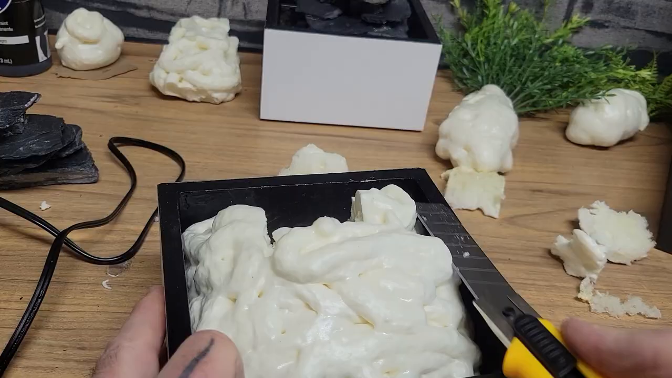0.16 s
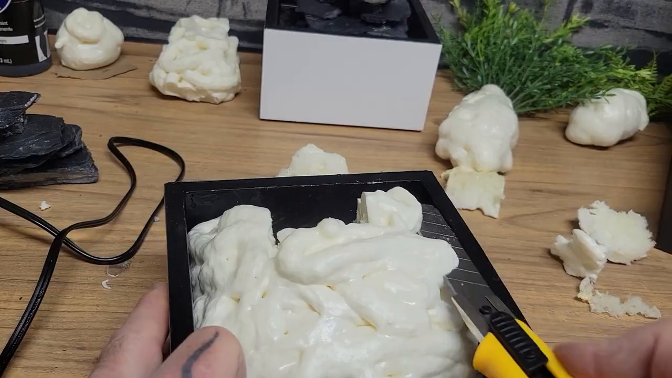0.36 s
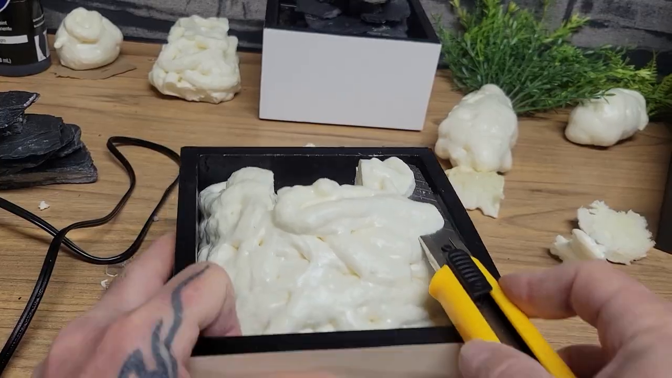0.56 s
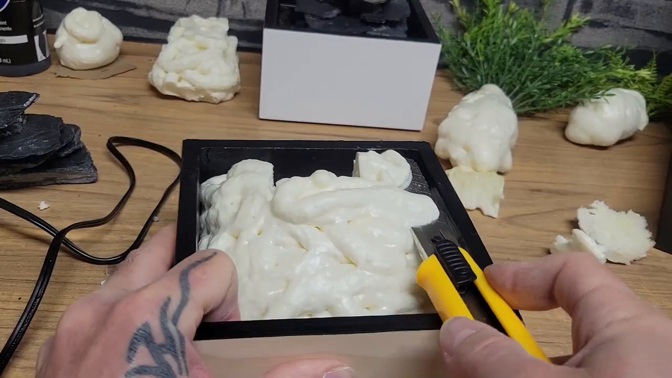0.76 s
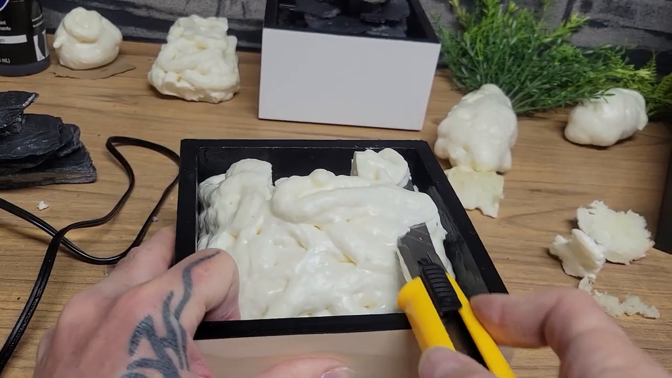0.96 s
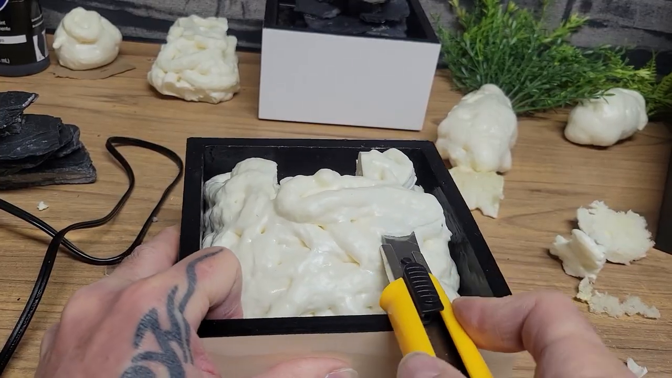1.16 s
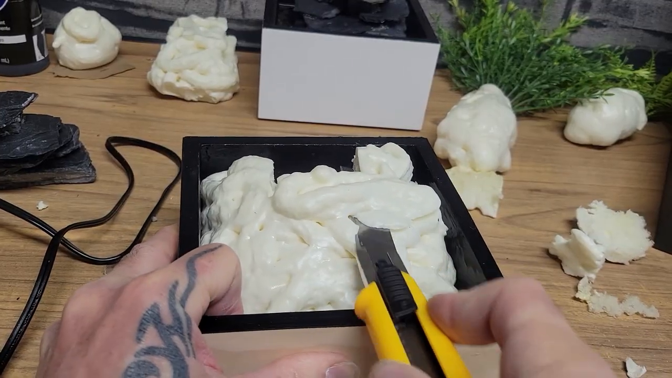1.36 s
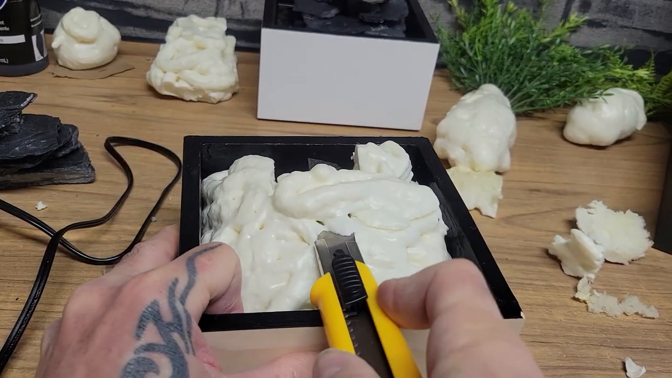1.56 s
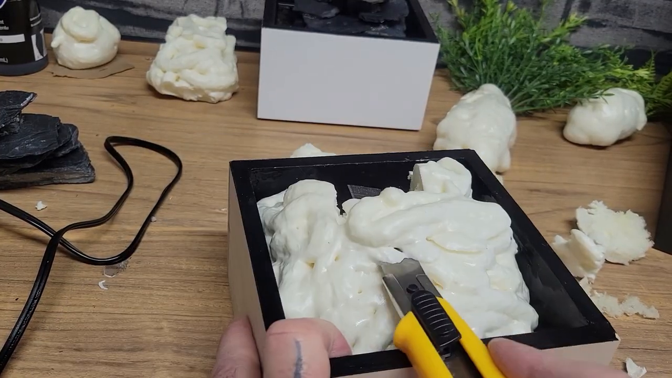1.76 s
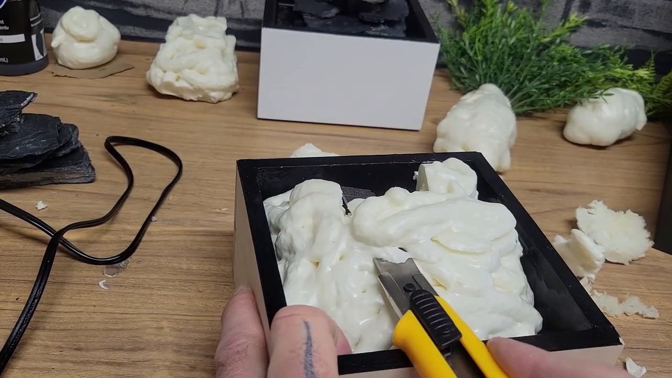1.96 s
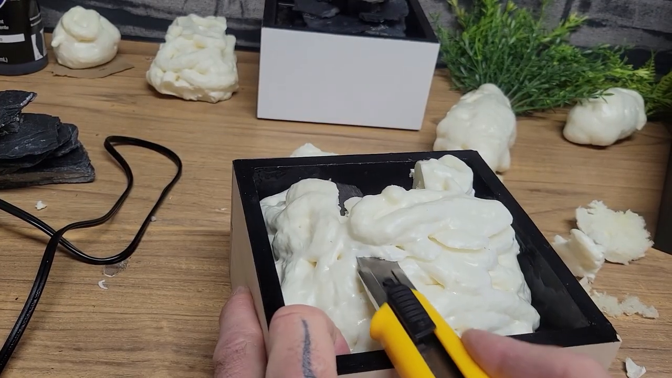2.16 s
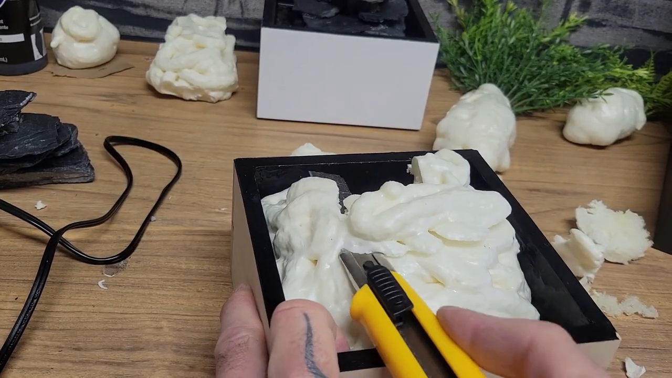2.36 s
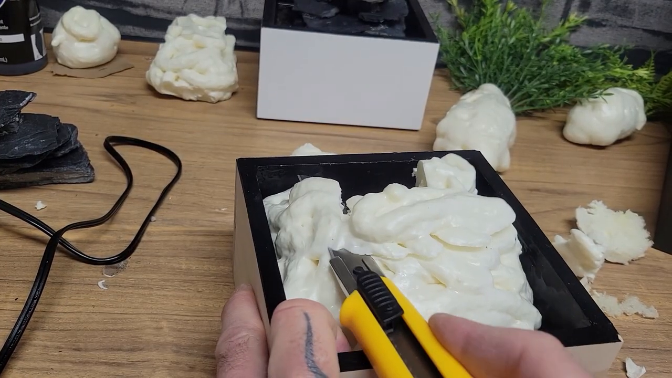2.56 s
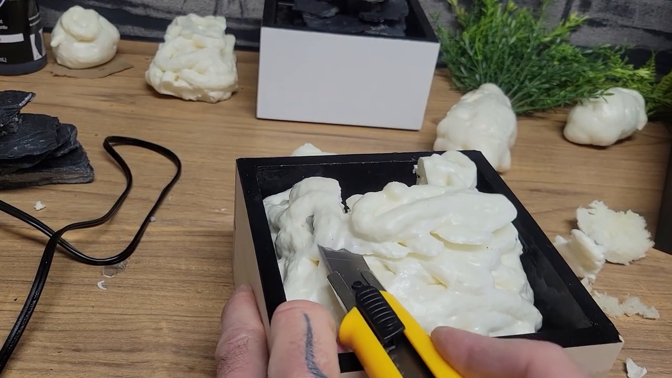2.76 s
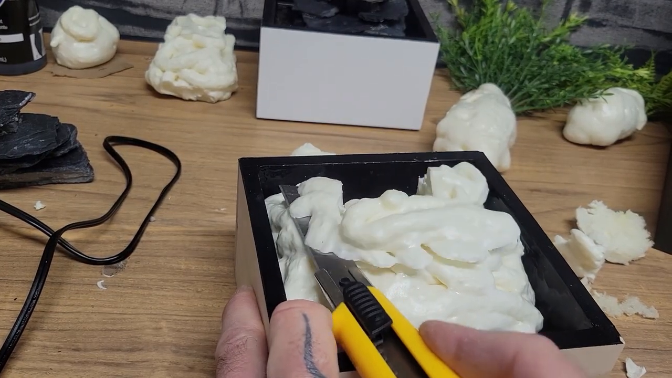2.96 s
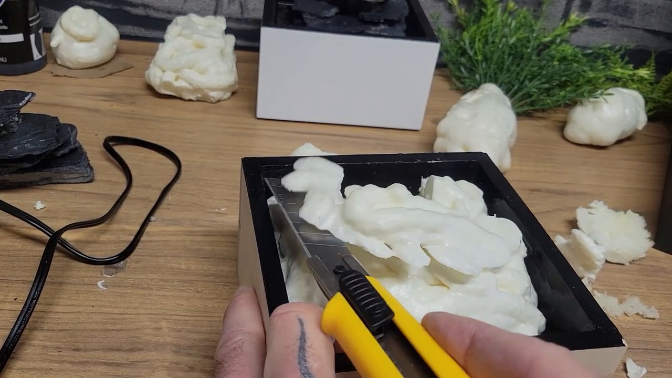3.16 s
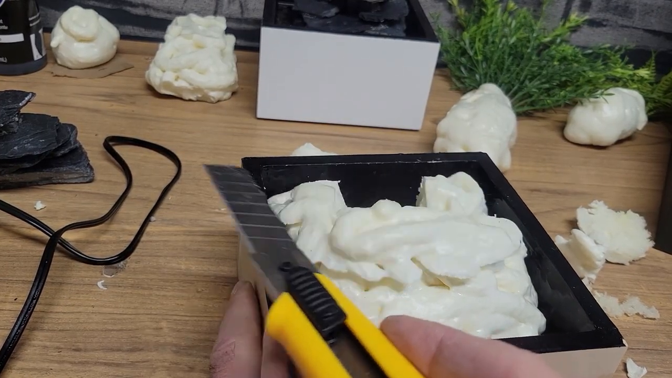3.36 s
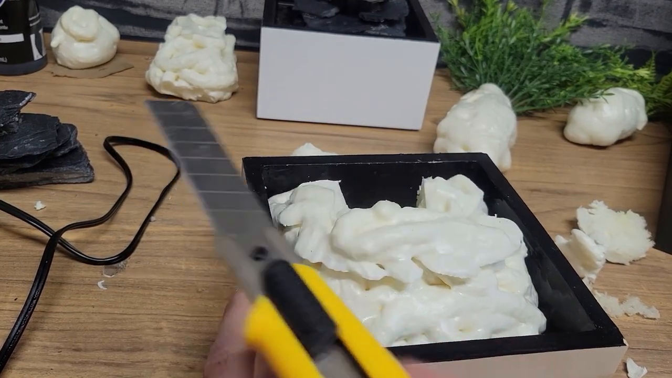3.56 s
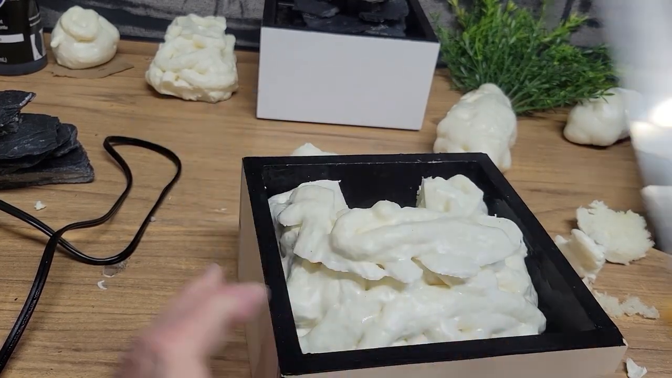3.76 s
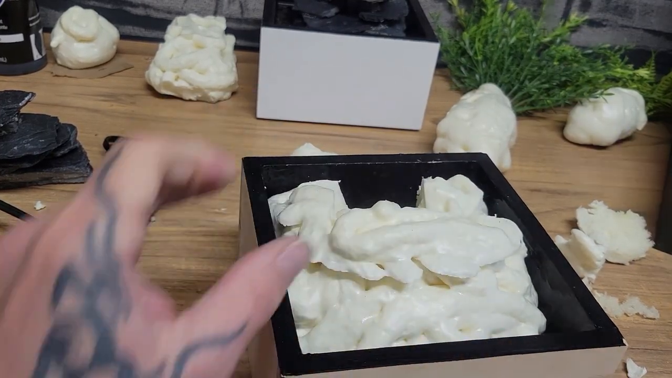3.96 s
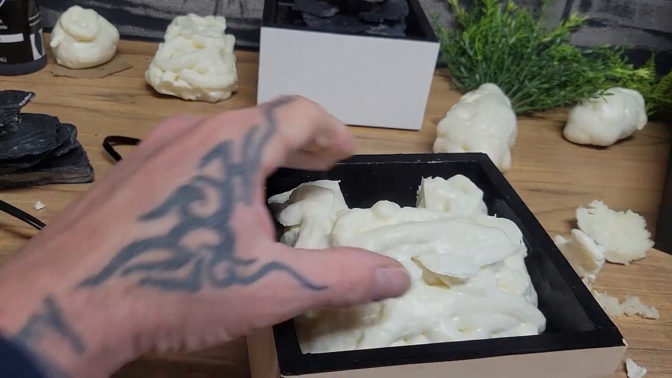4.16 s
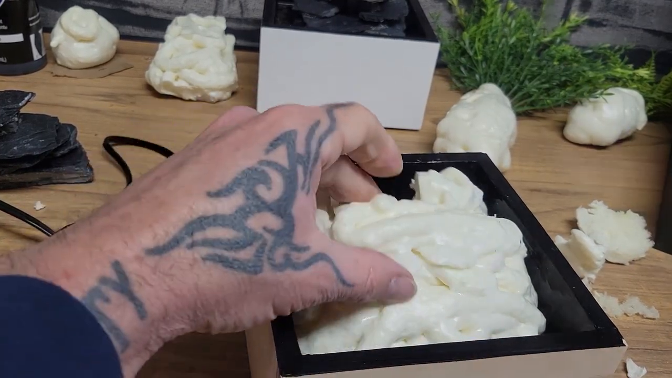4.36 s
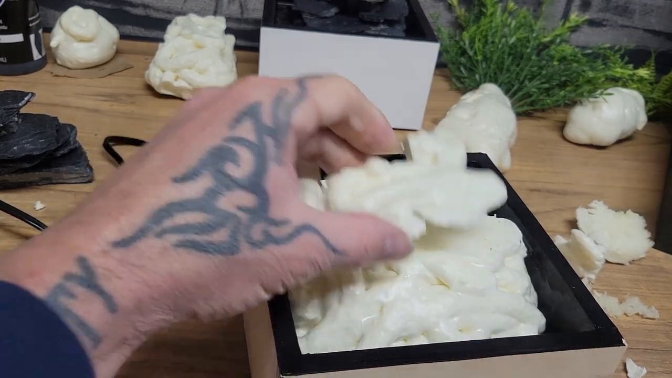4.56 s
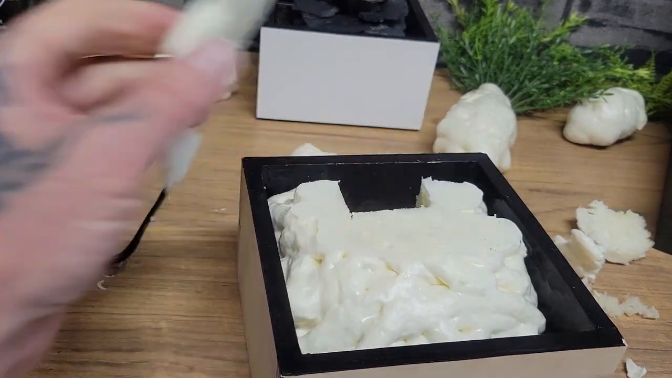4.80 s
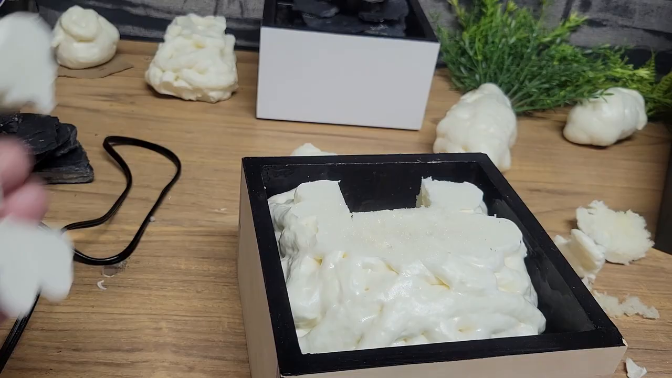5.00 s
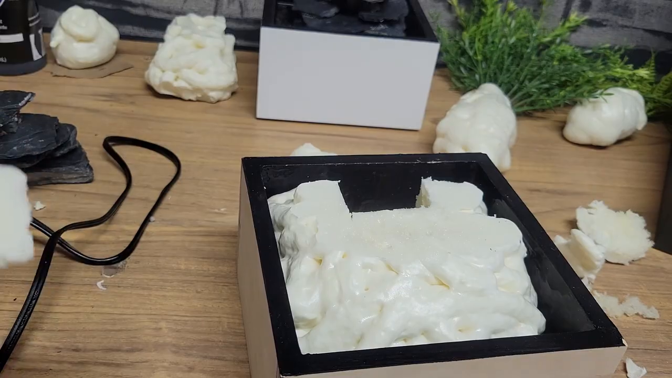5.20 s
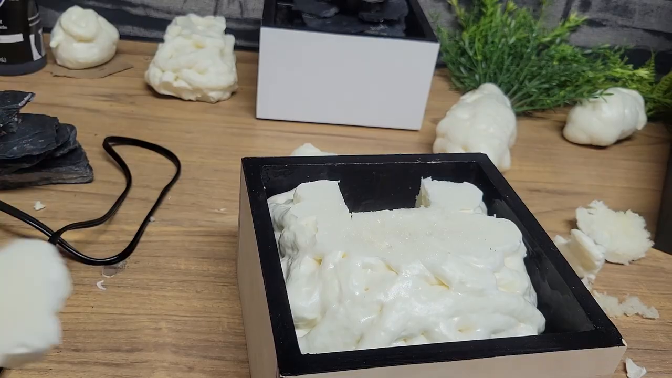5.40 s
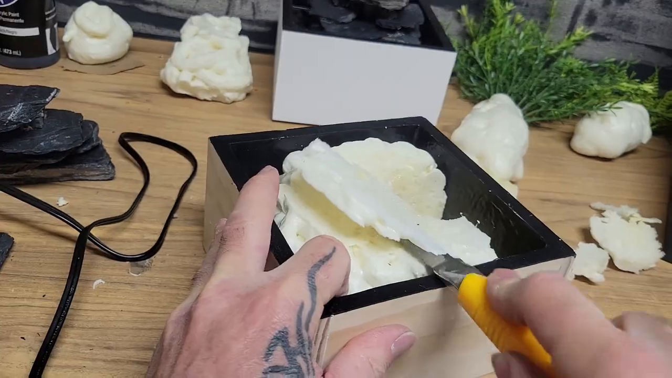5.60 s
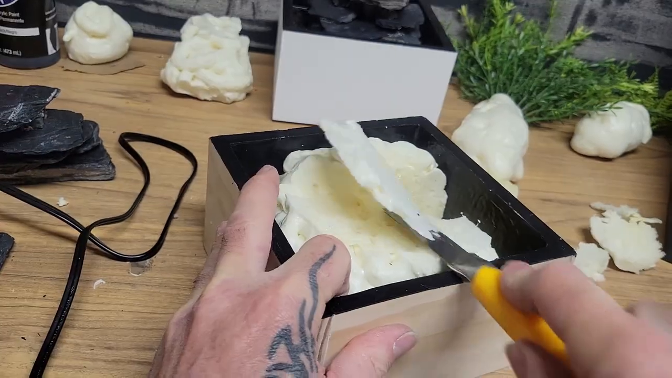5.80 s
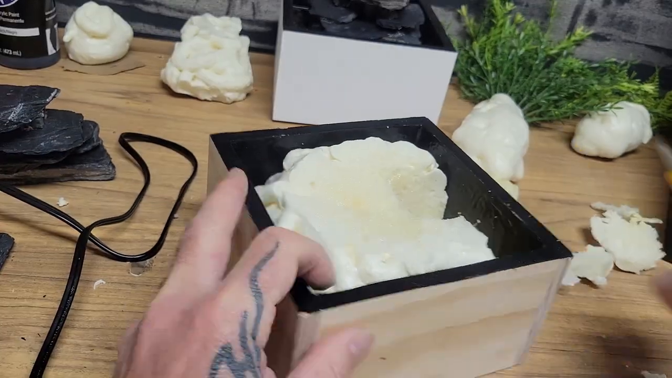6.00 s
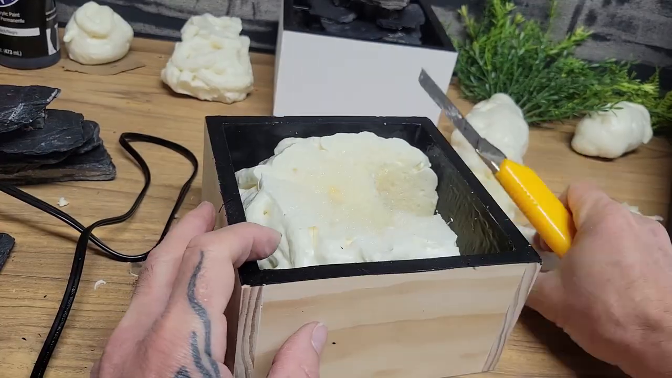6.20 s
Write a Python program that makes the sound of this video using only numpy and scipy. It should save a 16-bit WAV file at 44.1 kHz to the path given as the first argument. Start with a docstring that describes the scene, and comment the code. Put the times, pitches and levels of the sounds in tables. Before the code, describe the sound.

A close phone pickup in a quiet indoor room with low rumble and a faint hum that soon fades. At about 0.2 seconds six quick, loud rasps of a blade in stiff foam, each with a short squeak, end by 0.4. Soft hand rustles follow. From 0.65 to 1.6 a steady run of rapid strokes, nearly thirty a second, dry and gritty with changing squeak pitches and dull box knocks. A tiny hush at 1.7, then slightly slower sawing from 1.8 to 3.1, squeakier and brighter around 2.2 to 2.5, with stronger wooden bumps. It stops; small ticks near 3.4, faint brushing, and a soft rubbing grip at 4.3 to 4.5. Crisp rustles and clicks swell from 5.1 to 5.5. A brief, weaker cut runs 5.55 to 5.8 over a low bench ring, then knocks, ticks and light rustles to the end.

```python
"""A snap-off knife is heard sawing stiff foam in quick strokes, about 25 a second, close to a phone.
The foam lies in a wooden box on a bench. Each stroke tears cells (banded noise rasp) and makes the
blade stick and slip (harmonic squeak); between cuts hands rustle and pull, and ticks crack and ring.
The box knocks on the bench (decaying modes), and the bench top rings low (a gliding sine).
Behind lie a faint machine hum and a quiet room of shaped noise; two microphone ports hear it all."""
import sys
import numpy as np
from scipy import signal
from scipy.fft import rfft, irfft, next_fast_len
from scipy.io import wavfile
from scipy.ndimage import uniform_filter1d

SR = 44100
rng = np.random.default_rng(int(sys.argv[2]) if len(sys.argv) > 2 else 0)


def inscribe(sig):
    """Save sig as 16-bit PCM at rate SR to the path in sys.argv[1].

    A 1-D sig is mono; a 2-D sig holds one channel per row.
    Samples are clipped to [-1, 1] before scaling.
    """
    pcm = np.round(np.clip(np.atleast_2d(sig).T, -1, 1) * 32767)
    wavfile.write(sys.argv[1], SR, pcm.astype(np.int16))


N = 275184
T = np.arange(N) / SR

# All levels are those ahead of the phone's gain control.
# Knife strokes: peak_s, rise_ms (from 8 dB below the peak), rasp_db, squeak_hz, squeak_over_rasp_db
STROKES = [(0.1892, 8.1, -39, 824, 0), (0.2259, 8.7, -18, 1518, -3), (0.2569, 5.7, -25.5, 829, 6),
           (.2873, 6.7, -18, 1163, 1.5), (0.3223, 6.4, -21.5, 845, 0), (0.3517, 5.9, -25, 2019, 6.5),
           (0.629, 3.5, -49.5, 1820, -4), (.6725, 3, -38, 587, -3), (.6861, 8.2, -26, 587, 3.5),
           (0.7212, 6.9, -30, 1583, 3), (0.7511, 6.9, -19, 1976, -3.5), (0.7942, 7.8, -27, 1502, 3.5),
           (0.8295, 6.6, -20, 867, -1.5), (0.8655, 5.3, -23, 1346, -5.5), (0.8983, 5.4, -21, 641, -1),
           (0.9373, 7.3, -21.5, 1378, 0), (0.9727, 8, -24.5, 624, 4.5), (1.0088, 7.3, -27.5, 1152, 4),
           (1.0423, 5.5, -22, 1464, -4.5), (1.0818, 7.4, -31.5, 915, -4.5), (1.117, 7.2, -24.5, 991, -1.5),
           (1.151, 6.2, -30, 894, -5), (1.1862, 9.1, -25.5, 1976, -1), (1.2258, 8.9, -31, 668, -4.5),
           (1.2623, 8.8, -28.5, 619, -5.5), (1.2935, 8.9, -41, 603, 4), (1.335, 14.6, -22.5, 549, 4),
           (1.368, 12, -35.5, 603, 5), (1.4059, 13, -27, 511, -2.5), (1.4399, 9.9, -28.5, 942, -9),
           (1.4774, 12.2, -24.5, 1141, -8.5), (1.5108, 8.6, -29, 1077, -12.5), (1.5439, 8.2, -21, 1093, 0),
           (1.5731, 5.6, -31.5, 1077, -7.5), (1.7868, 10.8, -29, 985, -9), (1.837, 14.7, -32, 856, -8),
           (1.888, 11, -25, 646, -9), (1.9279, 11, -30.5, 484, -7), (1.985, 13.8, -22.5, 1728, -12),
           (2.0297, 13, -33.5, 1260, -5.5), (2.075, 8.2, -23.5, 2030, -13), (2.1248, 16, -23.5, 1615, -7.5),
           (2.1677, 13.6, -25, 1846, 3), (2.203, 6.7, -27, 1700, 0), (2.2233, 15, -24, 2150, 3.5),
           (2.2607, 6.5, -20, 1529, 2.5), (2.3024, 7.3, -19.5, 1335, 0), (2.3491, 8.2, -21, 1400, -1.5),
           (2.3928, 8, -19, 1500, -0.5), (2.4416, 9.6, -22.5, 1475, 5.5), (2.4936, 17.3, -27, 1534, 1.5),
           (2.5338, 9.3, -23.5, 1184, -5.5), (2.5859, 14.7, -28, 1820, -1), (2.6274, 10.7, -28.5, 1254, 3),
           (2.6694, 10.8, -29.5, 1480, 0), (2.712, 11.7, -27.5, 1378, 5), (2.7558, 11, -23.5, 1787, 1),
           (2.802, 10.5, -26, 1174, 1.5), (2.8481, 12.5, -26, 1890, -3), (2.8826, 7.9, -29.5, 2250, -7),
           (2.9289, 7.2, -30.5, 2056, 0), (2.9699, 12, -28.5, 1814, -7), (3.0123, 8.8, -31.5, 1701, -3),
           (3.0497, 8.4, -29, 1798, -7.5), (3.0639, 7.6, -33, 1653, -12), (5.5501, 5, -46, 1044, 5),
           (5.575, 3.7, -39.5, 1100, -1), (5.5919, 5.4, -26.5, 3710, 0), (5.622, 6.5, -42.5, 980, 4),
           (5.6466, 4.6, -49, 2272, -6), (5.6783, 10.3, -39, 888, -6), (5.711, 8.7, -31, 2200, -3),
           (5.7354, 5.1, -28.5, 1136, -7), (5.772, 7.9, -36.5, 1114, -10.5), (5.799, 9, -32.5, 1292, -10),
           (5.8186, 10.5, -29, 1292, -17)]
# The blade drags on between strokes, one list per cut: time_s, rasp_db
DRAG = [
    [(0.17, -77), (0.332, -70), (0.41, -77.5)],
    [(0.65, -58.5), (0.85, -43), (0.926, -55.5), (1.43, -67.5), (1.6, -72)],
    [(1.77, -68), (1.986, -44), (2.296, -39.5), (2.912, -46.5), (3.064, -49.5), (3.11, -65.5)],
    [(5.53, -53), (5.644, -61), (5.87, -72)],
]
# Colour of the rasp as the blade moves through the block: time_s, sizzle_over_rasp_db, body_over_rasp_db
CUT_COLOUR = [(.2, -4.5, 1), (.35, 2.5, 1.5), (0.629, -5, 0), (.83, 2, -2), (1.0, 1, -1), (1.3, -6, -9),
              (1.569, 0, -2), (1.79, -4.5, -4), (2.1, -4, -7), (2.25, -0.5, 1), (2.35, 2, -1),
              (2.6, 0, -4.5), (2.87, 4.5, -5), (3.06, 2, -12.5), (5.55, 7.5, 5.5), (5.595, -5, -5),
              (5.63, 4, 4), (5.72, -1.5, 0.5), (5.821, -1.5, -1)]
# Mean spectrum of tearing foam: frequency_hz, relative_level_db (per Hz)
FOAM_SPECTRUM = [(250, -24), (420, -23), (544, -6.5), (736, -6.5), (870, -2.5), (1040, -6), (1390, -3),
                 (2480, -7.5), (3570, -3), (7860, -6.5), (11000, -14.5), (15100, -10), (15800, -20.5)]
# Harmonics of the sharp slip pulse, from the fundamental up: relative_level_db
SQUEAK_HARMONICS_DB = [5.5, -7.5, -12.5, -16.5, -24]
# Hands brush and pull the foam: peak_s, swell_ms (to 8 dB below the peak), rasp_db,
# sizzle_over_rasp_db, body_over_rasp_db
RUSTLES = [(.12, 27, -77.5, 9, -17), (0.387, 7.5, -48, -8, 3), (.485, 15, -61.5, -18, 13),
           (.52, 22, -62.5, -12, 12), (1.599, 6.8, -52, -12, -6), (1.631, 9.7, -51.5, -7, -5),
           (3.132, 25, -73, 5, -8), (3.21, 27, -72.5, 1, 4), (3.278, 33, -71, -7, 12),
           (3.71, 62, -71.5, -9.5, -21.5), (3.82, 40, -66.5, -12.5, -32), (4.07, 25, -73.5, -16, -24.5),
           (4.264, 14, -57.5, -0.5, -32), (4.325, 33, -52, -4.5, -6), (4.365, 31, -51, -5, 2.5),
           (4.418, 40, -52.5, -6.5, -1), (4.761, 42, -65.5, 4.5, -5.5), (4.914, 21, -71, -2, -30),
           (5.0, 46, -73, 3, -29), (5.098, 31, -56.5, 3, -16), (5.137, 17, -55, 2.5, -15),
           (5.23, 23.7, -46.5, -1.5, -22), (5.36, 33.6, -47.5, 1, -18), (5.469, 42.4, -43, 6, -16),
           (5.51, 22, -47.5, -1, -16), (5.856, 21, -63, -2, -5.5), (5.985, 16.5, -57.5, -21, 7.5),
           (6.055, 17.2, -50, 0, -11.5), (6.184, 14.7, -50, -0.5, -5), (6.226, 11, -52.5, 1, -5)]
# Skin sticks and slips on the foam: pitch_hz, level_over_grip_db
SKIN_RUB = [(800, 3), (1050, -4.5), (1350, -2)]
# Crumbs snap and plastic taps: start_s, level_db, ring_hz
TICKS = [(0.599, -62, 844), (3.339, -39, 755), (3.3746, -52, 750), (3.4375, -51, 3220), (4.1998, -58, 705),
         (4.3027, -42.5, 5910), (4.5457, -58, 853), (4.912, -56, 6760), (5.187, -47, 7440),
         (5.368, -35.5, 5900), (5.8844, -47, 770), (5.9019, -46, 703), (6.0593, -41.5, 1162),
         (6.0957, -52, 1112)]
# The box knocks on the bench: thud_risen_s, thud_peak_db, wood_over_thud_db
KNOCKS = [(0.362, -46.5, -14), (0.767, -44.5, -2.5), (0.825, -40.5, -3), (0.932, -42.5, 2),
          (1.126, -44, 13), (1.2, -45.5, 5), (1.255, -33, -4), (1.435, -48, 9.5), (1.588, -36.5, 0.5),
          (1.802, -45.5, 10), (1.885, -28, 5), (1.915, -40, 10), (1.999, -35, -0.5), (2.097, -37, -3.5),
          (2.188, -31, 2.5), (2.299, -34, 14), (2.383, -31, 9), (2.47, -40.5, -4), (2.527, -37.5, 0),
          (2.644, -37.5, 0.5), (2.73, -40, 1.5), (2.862, -41.5, -7), (3.338, -51, 8.5), (5.549, -49, 8),
          (5.588, -53, 15), (5.762, -60, 8), (5.821, -36.5, 10), (5.974, -35, -0.5), (6.0, -35, -8.5),
          (6.158, -57, -1)]
# Modes of the thud: pitch_hz, relative_level_db, t60_s
THUD_MODES = [(129.4, -4.5, 0.23), (138, -12, .12)]
# Mean modes of the wood, varied from knock to knock: pitch_hz, relative_level_db, t60_s
WOOD_MODES = [(204, -3.5, 0.07), (326, 1, 0.083), (401, 1, 0.069), (576, -2.5, 0.063)]
# Low ring of the bench top: time_s, pitch_hz, level_db
BENCH_RING = [(2.3, 89.3, -51), (2.39, 90.85, -48), (2.461, 97, -51.5), (2.839, 94.5, -70),
              (2.949, 93.8, -44.5), (3.02, 79.5, -61), (3.11, 86.9, -46), (3.54, 98, -59.5),
              (3.64, 90.2, -46), (4.25, 90.56, -49), (4.49, 100, -65), (5.251, 95.8, -57.5),
              (5.329, 92.3, -67), (5.601, 90.7, -46), (5.7, 84.9, -33), (5.95, 79.4, -37), (6.0, 83.1, -76),
              (6.05, 83.3, -47), (6.24, 76, -60)]
# Partials of the machine hum: multiple_of_hum_pitch, relative_level_db
HUM_PARTIALS = [(0.998, 0), (1.26, -8), (1.704, -6), (1.984, -12)]
# Mains tones: pitch_hz, level_db
MAINS = [(51.3, -66.5), (101.3, -67)]
# Mean spectrum of the room: frequency_hz, relative_level_db (per Hz)
ROOM_SPECTRUM = [(15, -35.5), (27, -12.5), (45, -2), (101, -5.5), (186, -19.5), (415, -17.5), (604, -25.5),
                 (769, -27), (2130, -42.5), (5420, -49.5), (8550, -57), (15000, -60)]
# Likeness of the room at the two ports: frequency_hz, correlation (-1 to 1)
ROOM_LIKENESS = [(60, 0.82), (150, 1), (400, -0.66), (900, -0.51), (8000, 0.17)]
# Course of the room: time_s, rumble_db (25-62 Hz), murmur_db (230-480 Hz)
ROOM_LEVEL = [(0.0, -59, -63), (0.76, -67.5, -63), (1.08, -58, -58), (1.39, -66, -60),
              (1.648, -63.5, -67.5), (2.26, -62, -58), (3.111, -62.5, -71.5), (3.2, -54.5, -68.5),
              (4.4, -63.5, -72.5), (5.541, -60.5, -71), (5.79, -47, -55.5), (5.98, -62.5, -63),
              (6.24, -53.5, -70.5)]

# the foam's ranges: body below, rasp between, sizzle above; the top is cut at the end
BODY_TOP_HZ, SIZZLE_HZ, TOP_HZ = 2450, 7000, 15900
DRAG_SIZZLE_DB, DRAG_BODY_DB = -16, 0.5  # over the rasp of the drag
# a stroke dies away in step with the time left before the next one builds up
FALL_MS, FALL_PER_WAIT, LONGEST_WAIT_MS = 4.13, .25, 31.7
LAG_SPREAD_SAMPLES, TURN_SPREAD_RAD, STROKE_PAN_DB = 3.5, 1.27, 1.14  # spread between ports
WALL_MS, WALL_SPREAD_DB, BOUNCE = 1.1, 3.5, .3  # median echo delay, its spread, share returned
CUT_GAIN_DB = 0.84  # on all rasp
RUSTLE_HZ, RUSTLE_DB = 2910, -12  # a band in which rustles are loudest; over the rasp
GRIP_S, GRIP_RISE_MS, GRIP_FALL_MS, GRIP_DB = 4.4, 63, 60, -45  # the hand closes on the cut piece
CRACK_T60_S, TICK_T60_S = 0.018, 0.027
HUM_HZ, HUM_DB, HUM_FADE_START_S, HUM_FADE_DB_PER_S = 220.7, -55, 0.65, 71


def cutting():
    """Strokes, drag and hands share the foam's rasp; each stroke draws its own lag, phase, echo delay and pan."""
    saw, stroke = strokes()
    hand, grip = hands()
    draw = rng.standard_normal((len(STROKES), 4))[stroke].T
    lag = np.round(LAG_SPREAD_SAMPLES * draw[0]).astype(int)
    turn = TURN_SPREAD_RAD * draw[1]
    wall_ms = WALL_MS * undb(WALL_SPREAD_DB * draw[2])
    sawing = saw[0] > hand[0]

    torn = rasp(saw[:3] + blade_drag() + hand[:3], lag)
    sound = undb(CUT_GAIN_DB) * box_walls(torn, wall_ms, BOUNCE * sawing)

    hz = np.array(STROKES)[stroke, 3]
    shake = .04 * (hz / 1200) ** .6  # high squeaks are shakier
    sound += squeak(saw[3], hz, turn, SQUEAK_HARMONICS_DB, waver=shake, flutter_db=0.5)
    for rub_hz, rub_db in SKIN_RUB:
        sound += undb(rub_db) * squeak(grip[3], rub_hz, turn, [0], waver=0.0703, flutter_db=3.5)
    sound += undb(RUSTLE_DB) * squeak(hand[0], RUSTLE_HZ, turn, [0], waver=.13, flutter_db=3.5)

    pan_db = STROKE_PAN_DB * draw[3] * sawing
    return sound * undb(np.array([pan_db, -pan_db]) / 2)


def strokes():
    """Each push of the blade swells and dies away, coloured by where it is in the block."""
    s, rise, db, _, squeak_db = np.transpose(STROKES)
    wait_ms = 1000 * np.diff(s, append=99) - np.roll(rise, -1)
    fall = FALL_MS + FALL_PER_WAIT * np.minimum(wait_ms, LONGEST_WAIT_MS)
    at, sizzle, body = np.transpose(CUT_COLOUR)
    over_rasp = np.array([0 * s, np.interp(s, at, sizzle), np.interp(s, at, body), squeak_db])
    return swells(s, rise, fall, db + over_rasp, rise_shape=1.91, fall_shape=1.615)


def blade_drag():
    """Power of rasp, sizzle and body as the blade drags on through each cut."""
    power = np.zeros(N)
    for cut in DRAG:
        s, db = np.transpose(cut)
        edge = np.clip(np.minimum(T - s[0], s[-1] - T) / .012 + .5, 0, 1)
        power += edge * undb(2 * np.interp(T, s, db))
    return power * undb(2 * np.array([[0], [DRAG_SIZZLE_DB], [DRAG_BODY_DB]]))


def hands():
    """Powers of hands brushing the foam and of one slow grip, as rounded swells."""
    s, swell, db, sizzle, body = np.transpose(RUSTLES)
    levels = db + np.array([0 * s, sizzle, body, body])
    hand, _ = swells(s, swell, swell, levels, rise_shape=1.95, fall_shape=1.27)
    grip, _ = swells(np.array([GRIP_S]), [GRIP_RISE_MS], [GRIP_FALL_MS], np.full((4, 1), GRIP_DB),
                     rise_shape=4.5, fall_shape=2.3)
    return hand, grip


def swells(s, rise, fall, levels_db, rise_shape, fall_shape):
    """Power of rasp, sizzle, body and squeak summed over events; also which event is the nearest."""
    power = np.zeros((4, N))
    steep = np.array([[1], [1.1], [.9], [1.5]])  # slipping stops first as the motion slows
    for k in range(len(s)):
        i = slice(max(int((s[k] - .15) * SR), 0), int((s[k] + 0.21) * SR))
        dt = 1000 * (T[i] - s[k])
        before = np.abs(dt / rise[k]) ** rise_shape
        after = np.abs(dt / fall[k]) ** fall_shape
        swell_db = -8 * np.where(dt < 0, before, after)
        power[:, i] += undb(2 * (swell_db * steep + levels_db[:, [k]]))
    return power, np.searchsorted((s[1:] + s[:-1]) / 2, T)


def rasp(power, lag, grain_db=1.5, patchy_db=1.5, alike=0.44):
    """Bursting cells of very uneven size; the colour is patchy from moment to moment.
    Part reaches both ports alike but for a lag, the rest is independent noise at each port."""
    size = next_fast_len(N)
    f = np.arange(size // 2 + 1) * SR / size
    colour = undb(on_log(FOAM_SPECTRUM, f))
    cell_size = rng.exponential(size=N) / 2 + walk(450)
    cells = rng.standard_normal((3, N)) * undb(grain_db * cell_size)
    spectra = rfft(cells / np.std(cells), size) * colour

    # log gain of each range against the foam's mean colour
    ranges = (BODY_TOP_HZ, SIZZLE_HZ), (SIZZLE_HZ, TOP_HZ), (0, BODY_TOP_HZ)
    gains = []
    for p, (lo, hi) in zip(power, ranges):
        mean_power = np.mean(colour ** 2 * (f > lo) * (f < hi))
        gains.append(np.log(p + 1e-14) / 2 - np.log(mean_power) / 2)
    rasp_gain, sizzle_gain, body_gain = gains

    out, edges = 0, np.geomspace(250, 17000, 25)
    for lo, hi in zip(edges[:-1], edges[1:]):
        band = irfft(spectra * ((f >= lo) & (f < hi)), size)[:, :N]
        body = on_log([(1700, 0.98), (2800, 0)], lo)
        sizzle = on_log([(5500, 0.2), (8500, 1)], lo)
        gain = body * body_gain + sizzle * sizzle_gain + (1 - body - sizzle) * rasp_gain
        out = out + band * np.exp(gain) * undb(patchy_db * walk(26))

    share = np.clip(alike, 0, 1)
    late = out[0][np.clip(np.arange(N) - lag, 0, N - 1)]
    return np.sqrt(share) * np.array([out[0], late]) + np.sqrt(1 - share) * out[1:]


def box_walls(x, wall_ms, bounce):
    """Sound bounces between foam and box wall; echo delay and narrow peaks change with the stroke."""
    delay, i = (wall_ms * SR / 1000).astype(int), np.arange(N)
    g = np.clip(bounce, 0, .9)
    echoes = sum(g ** k * x[:, np.maximum(i - k * delay, 0)] for k in range(5))
    return echoes * np.sqrt(1 - g ** 2)


def squeak(power, hz, turn, orders_db, waver, flutter_db):
    """The surface sticks and slips at a shaky rate, in fits; turn is the phase between the ports."""
    phase = 2 * np.pi * np.cumsum(hz * (1 + waver * walk(520))) / SR
    fits = [undb(db + flutter_db * walk(320)) for db in orders_db]
    ports = []
    for p in (phase, phase + turn):
        ports.append(sum(g * np.sin((k + 1) * p) for k, g in enumerate(fits)))
    return unit(np.array(ports)) * np.sqrt(power) * undb([0.63 * walk(60), 1.0 * walk(81)])


def ticks():
    """Crumbs snap and plastic taps: a noise crack and a short ring of two partials."""
    out, t = np.zeros((2, N)), T[:SR // 10]
    for s, db, hz in TICKS:
        crack = rng.standard_normal((2, len(t))) * undb(-60 * t / CRACK_T60_S)
        partials = np.sin(2 * np.pi * hz * t) + 0.44 * np.sin(2 * np.pi * 1.49 * hz * t)
        ringing = undb(-60 * t / TICK_T60_S) * partials
        for ch in range(2):
            add(out[ch], s, undb(db) * (0.52 * crack[ch] + 0.67 * ringing))
    return out


def box_knocks():
    """The box knocks on the bench, stirring the wood's modes a little differently at either port."""
    out = np.zeros((2, N))
    chances = rng.standard_normal((len(KNOCKS), 2, 5))
    for (s, db, wood_db), chance in zip(KNOCKS, chances):
        for ch in range(2):
            modes = [(hz * (1 + 0.067 * c), d + 3.9 * c, t60)
                     for (hz, d, t60), c in zip(WOOD_MODES, chance[ch])]
            knock = ring(THUD_MODES, 0.0066) + undb(wood_db) * ring(modes, 0.0029)
            start_s = s - .005 + .0002 * abs(chance[ch, 4])  # ahead of the risen thud
            add(out[ch], start_s, undb(db) * knock)
    return out


def ring(modes, push_s):
    """A soft push into decaying modes (pitch_hz, level_db, t60_s); peak 1."""
    t = T[:SR // 2]
    y = sum(undb(db - 60 * t / t60) * np.sin(2 * np.pi * hz * t) for hz, db, t60 in modes)
    y = y * (1 - np.exp(-t / push_s))
    return y / np.abs(y).max()


def bench_top():
    """The bench top rings as one low sine of gliding pitch and unsteady level."""
    s, hz, db = np.transpose(BENCH_RING)
    level_db = np.interp(T, s, db, left=-99) + 1.2 * walk(15)
    return tone(np.interp(T, s, hz), level_db) * undb([1.0 * walk(4.2), 0.72 * walk(25)])


def hum():
    """Thin tones from machines in the room: a faint hum that fades out early, and the mains."""
    db = HUM_DB - HUM_FADE_DB_PER_S * np.maximum(T - HUM_FADE_START_S, 0)
    lines = sum(tone(k * HUM_HZ, db + d + 0.56 * walk(5.6)) for k, d in HUM_PARTIALS)
    return lines + sum(tone(hz, d + 1.4 * walk(1.8)) for hz, d in MAINS)


def room():
    """Rumble and murmur of the building: shaped noise, most alike at both ports in the bass."""
    f = np.arange(N // 2 + 1) * SR / N
    alike = np.clip(on_log(ROOM_LIKENESS, f), -1, 1)
    noise = rfft(rng.standard_normal((2, N))) * undb(on_log(ROOM_SPECTRUM, f))
    noise = noise * np.sqrt([1 + alike, 1 - alike])  # mid and side
    low = on_log([(90, 1), (200, 0.34)], f)
    s, *levels = np.transpose(ROOM_LEVEL)
    out = 0
    for share, (lo, hi), db in zip((low, 1 - low), ((25, 62), (230, 480)), levels):
        reference = np.std(irfft(noise[0] * (f > lo) * (f < hi), N))
        mid, side = irfft(noise * np.sqrt(share), N) / reference
        out = out + np.array([mid + side, mid - side]) * undb(np.interp(T, s, db) + 0.56 * walk(1.7))
    return out


def undb(db):
    """Amplitude of a level in dB."""
    return 10 ** (np.asarray(db) / 20)


def unit(x):
    """Scales to an RMS of 1."""
    return x / np.sqrt(np.mean(x ** 2))


def on_log(table, hz):
    """Reads (frequency_hz, value) points on a log-frequency axis."""
    f, v = np.transpose(table)
    return np.interp(np.log(np.maximum(hz, 1)), np.log(f), v)


def walk(rate):
    """Random levels, a new one every 1 / rate s, slewed between; RMS 1."""
    k = max(int(SR / rate), 2)
    held = np.repeat(rng.standard_normal(N // k + 1), k)
    return unit(uniform_filter1d(held, k)[:N])


def tone(hz, db):
    """A sine of given pitch and RMS level."""
    return np.sqrt(2) * undb(db) * np.sin(2 * np.pi * np.cumsum(hz * np.ones(N)) / SR)


def add(out, s, x):
    """Mixes x into out from s seconds on."""
    i = int(s * SR)
    out[..., i:i + len(x)] += x[:N - i]


def scene():
    """Everything at the two ports, from the knife to the room."""
    # the level dips briefly, by 23 dB, between the second and third cut
    hush = 1 - .93 * np.exp(-((T - 1.692) / .014) ** 2)
    return (cutting() + ticks() + box_knocks() + bench_top() + hum() + room()) * hush


def record(dry, top_db=-19.5, ratio=2.5):
    """The phone's gain control holds the loud strokes down, then the top is cut."""
    loud = np.sqrt(uniform_filter1d(np.mean(dry ** 2, 0), int(.005 * SR)) + 1e-12)
    gain = np.minimum(1, undb(top_db) / loud) ** (1 - 1 / ratio)
    held = dry * uniform_filter1d(gain, int(.003 * SR))
    return signal.sosfilt(signal.ellip(10, .2, 80, TOP_HZ, fs=SR, output="sos"), held)


dry = scene()
out = record(dry)
inscribe(out)
```